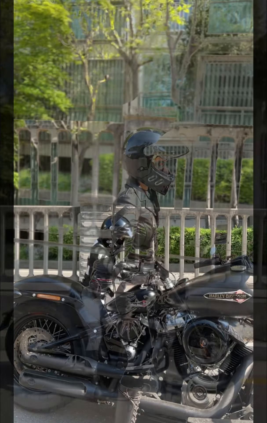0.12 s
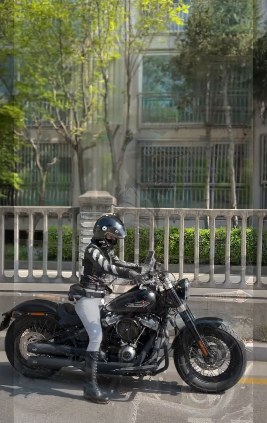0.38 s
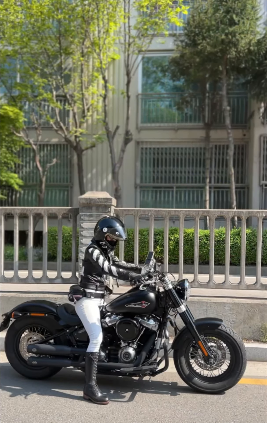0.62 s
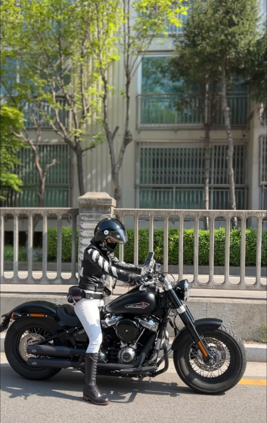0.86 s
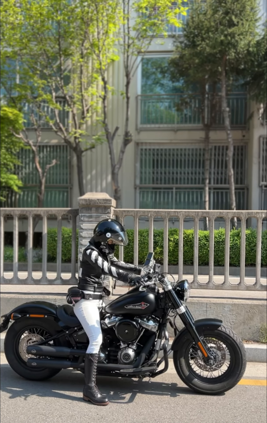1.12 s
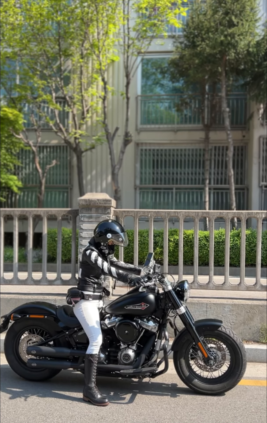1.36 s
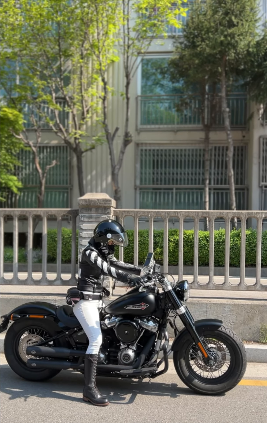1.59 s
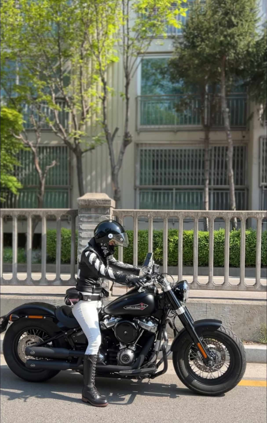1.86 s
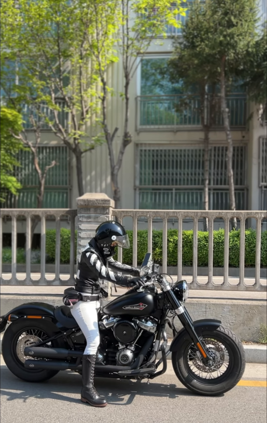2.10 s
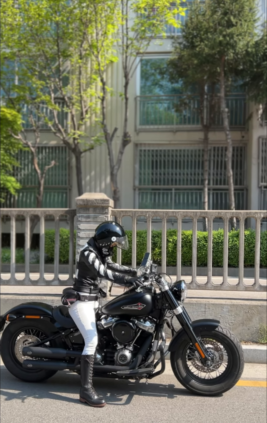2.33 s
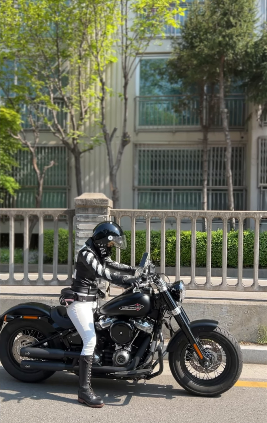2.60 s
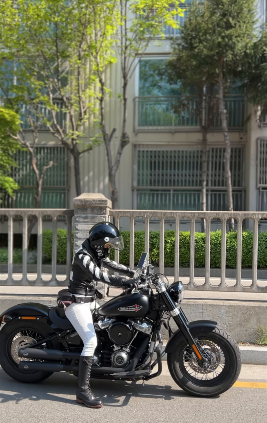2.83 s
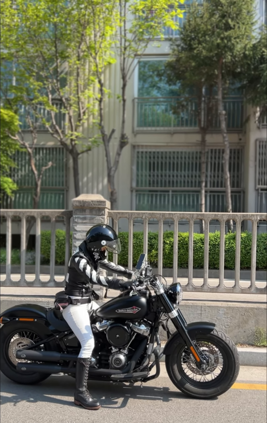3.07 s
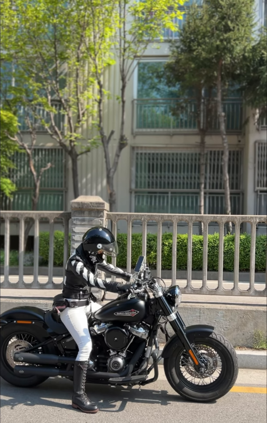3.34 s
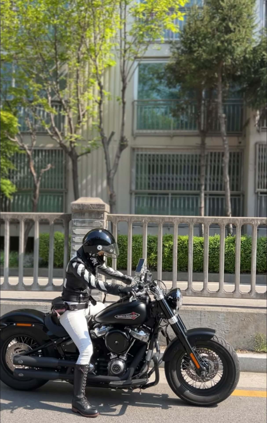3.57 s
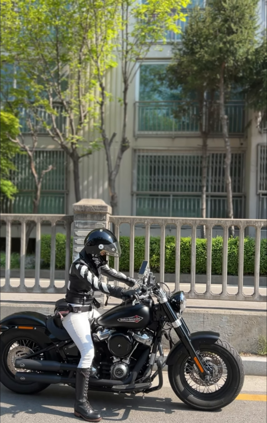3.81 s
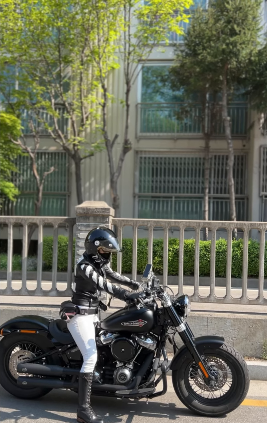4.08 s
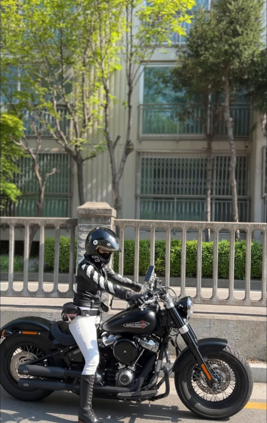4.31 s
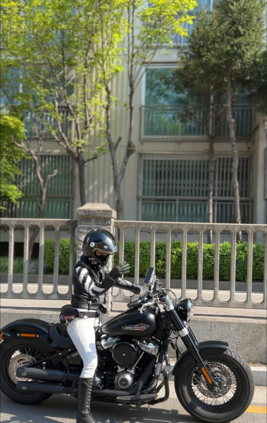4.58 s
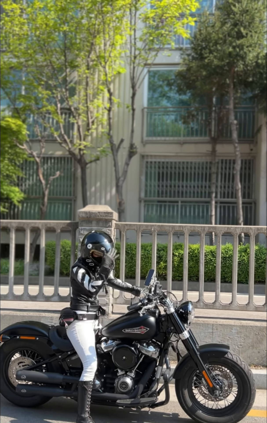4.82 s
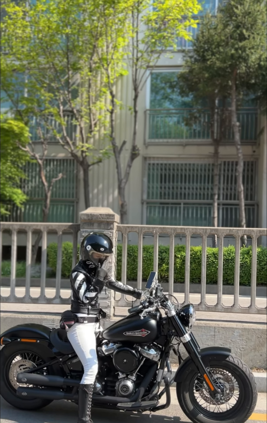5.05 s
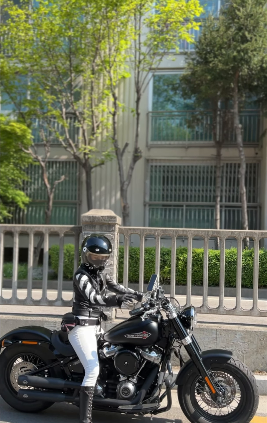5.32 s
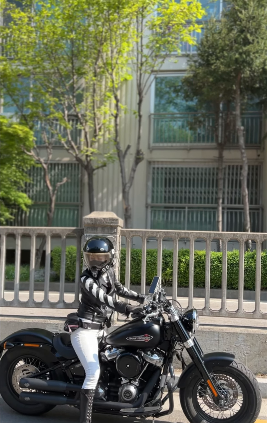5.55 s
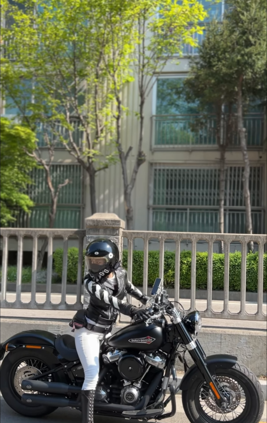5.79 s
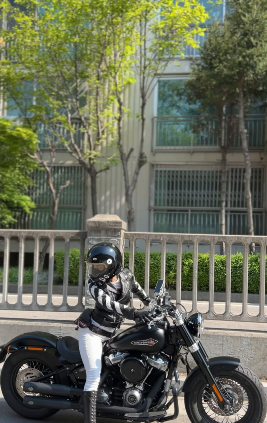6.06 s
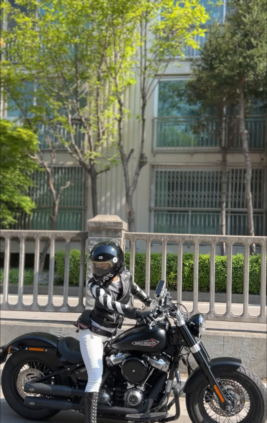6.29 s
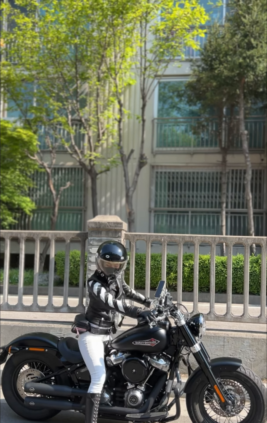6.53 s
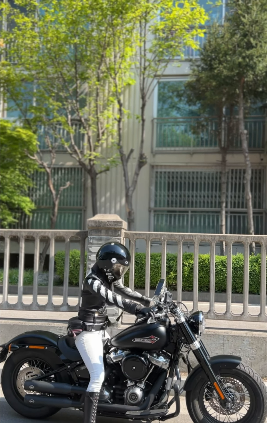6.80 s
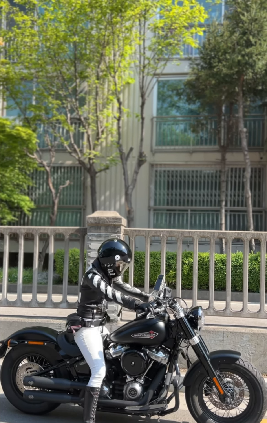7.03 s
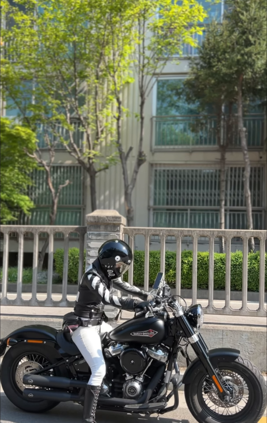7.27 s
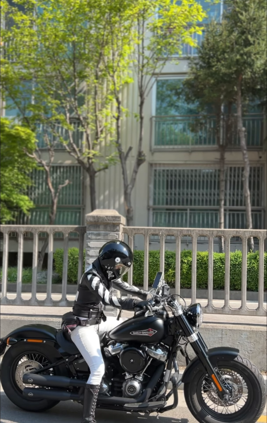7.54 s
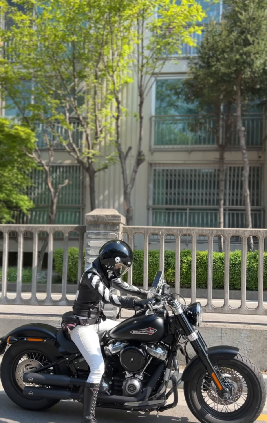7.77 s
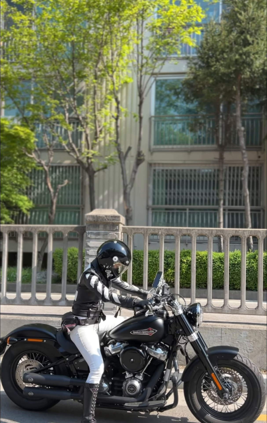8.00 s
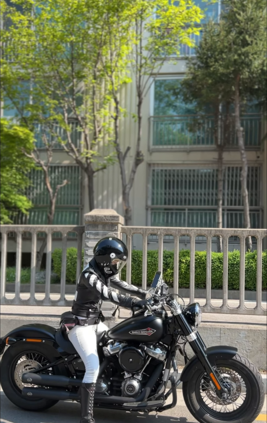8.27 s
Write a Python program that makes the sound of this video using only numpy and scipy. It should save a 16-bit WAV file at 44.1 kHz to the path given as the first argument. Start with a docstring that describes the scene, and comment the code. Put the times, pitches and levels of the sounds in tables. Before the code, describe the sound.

The first 0.7 seconds hold only soft, low distant traffic, a few dull wind puffs at 0.2 to 0.4 and barely audible high ticks. At 0.7 a starter clanks in with two hard metal knocks, then whirs and grinds, its pitch sagging at each compression with bursts of airy hiss. Low pops begin around 1.2, and the engine catches near 1.5 amid rapid clanking until 1.8. The big twin races, peaking about 2.05, then slows through 3.6 to a deep, lumpy, bassy idle, with a small lift near 4.1. Cases rattle, valves tick, gears whine unsteadily. A sharp lever click snaps at 3.5; lighter knocks come at 4.6 and 5.0. At 7.8 first gear engages with a heavy double clunk, a brief shudder and faint high squeak. Idling continues to 8.4, rising slightly. The bike is central, a few metres off, with short wall and road reflections and softened extreme treble.

```python
"""A big V-twin motorcycle starts up a few metres away in a quiet street: the starter clanks in and cranks,
the engine catches, races and settles to a lumpy idle, a lever clicks and first gear clunks in.
The exhaust note is a sum of waves locked to the engine cycle; the first firings ring a resonant pipe.
Starter, cases and valves are shaped noise, gears are wavering tones, and knocks ring metal modes.
Distant traffic and a few puffs of wind on the microphone lie underneath."""
import sys
import numpy as np
from scipy import signal
from scipy.fft import rfft, irfft
from scipy.io import wavfile
from scipy.ndimage import uniform_filter1d

SR = 44100
rng = np.random.default_rng(int(sys.argv[2]) if len(sys.argv) > 2 else 0)


def to_linear_factor(level_db):
    """Convert decibel levels (scalar or array-like) to linear amplitude factors."""
    exponent = np.asarray(level_db, float) / 20
    return 10 ** exponent


def store_wav(level_fs):
    """Save 16-bit WAV to argv[1]."""
    pcm = np.round(np.clip(np.atleast_2d(level_fs), -1, 1) * 32767)
    wavfile.write(sys.argv[1], SR, pcm.T.astype(np.int16))


N = 369999
T = np.arange(N) / SR  # time in seconds

# Colour of the distant traffic. Each row: frequency in Hz, relative level in dB.
TRAFFIC_COLOUR = [(15, -35), (25, -2), (64, 2.5), (394, -10.5), (446, -9.5), (599, -8.5), (889, -9.5),
                  (981, -9.5), (1080, -10.5), (1690, -16.5), (9000, -54), (11700, -87), (19800, -120)]
# Wind on the microphone. Each row: start in seconds (the crest is 0.02 s later), peak in dB.
WIND_PUFFS = [(0.182, -27), (0.299, -38), (0.372, -28)]
# Faint high ticks before the start. Each row: time in seconds, level in dB.
FAINT_TICKS = [(0.134, -57.5), (.188, -58), (.259, -59)]
# The starter labours over each compression. Each row: time of release in seconds, level of the grind in dB,
# level of the hiss in dB, hold of the grind in seconds (the hiss holds half as long).
COMPRESSIONS = [(.724, -33, -38, .004), (.83, -37.5, -33, 0.0051), (1.009, -25.5, -31, .055),
                (1.224, -25, -32.5, 0.032), (1.468, -23, -27.5, 0.017), (1.582, -18.5, -28, .01)]
# Resonances of the starter housing. Each row: frequency in Hz, width in Hz, relative level in dB.
HOUSING_RINGS = [(258, 68, 12.5), (872, 137, 11), (1237, 97, 8.5), (1844, 19, -5.5), (2270, 51, -14),
                 (2945, 23, 1.5), (3240, 44, -26), (3960, 52, -24.5)]
# Overtones of the starter pinion. Each row: multiple of its pitch, relative level in dB.
PINION_TONES = [(1, -2.5), (3, -3), (4, -4), (6, -10), (7, -10)]
# Metal knocks of starter gear, lever and gearbox. Each row: time in seconds, peak in dB,
# rattle decay in seconds, weight of the dull thud in dB, weight of the bright tick in dB.
METAL_KNOCKS = [(0.717, -9.5, 0.0034, -14, -13), (0.7424, -7, 0.0049, -9, -17),
                (0.8244, -18, 0.0058, -11, 5), (1.075, -26, 0.0088, 2, -26), (1.1868, -17, 0.026, -16, -10),
                (1.36, -18.5, 0.0066, -8, 5), (1.5093, -10.5, 0.015, -9, -5.5),
                (1.5503, -12.5, 0.0053, -8.5, -3.5), (1.5782, -6, 0.0044, -37, -11),
                (1.6451, -7, 0.0032, -11, -9.5), (1.6827, -5.5, 0.0058, -32, -10.5),
                (1.7383, -9, 0.0054, -23, -12), (1.772, -18.5, 0.02, -13, -25),
                (3.485, -3, 0.0052, -27, -26), (3.4985, -13, 0.0066, -7.5, -1.5),
                (4.622, -24, 0.006, -14, -20), (5.033, -13, 0.006, -3, -18),
                (7.8204, -2.5, 0.006, -12, -22), (7.836, -6, 0.008, 8, -22), (7.879, -16, 0.01, -6, -5),
                (7.9796, -25, 0.0053, -11, -16)]
# Ways the knocked metal rings. Each row: frequency in Hz, relative level in dB, time to fall 60 dB in seconds.
METAL_MODES = [(342, 11.5, 0.084), (610, -3, 0.05), (856, -6, 0.12), (1236, -6.5, 0.098), (1550, 3, 0.037),
               (1804, 6, 0.028), (2140, 3.5, 0.032), (2616, -6.5, 0.084), (2920, -5, 0.062),
               (3160, -9, 0.062), (4070, -26, 0.19), (5760, 1, 0.017), (6690, 4.5, 0.051),
               (7540, 1.5, 0.04), (9140, 3.5, 0.062)]
# Linkage squeak. The one row: start in seconds, end in seconds, centre pitch in Hz, level in dB.
LINKAGE_SQUEAK = (7.875, 7.97, 4050, -37)
# First uneven firings. Each row: time in seconds, relative strength in dB.
FIRST_FIRINGS = [(1.22, -1.5), (1.475, -3), (1.508, 0.5), (1.559, -0.5), (1.58, 2.5), (1.597, -1),
                 (1.644, 1.5), (1.688, -3.5), (1.737, 3), (1.774, 5), (1.819, 1)]
# Resonances of the exhaust pipe. Each row: frequency in Hz, width in Hz, relative level in dB.
PIPE_RINGS = [(62.6, 8.9, 0.5), (120, 12.5, 2.5), (166.3, 26, 2), (248, 62, -17)]
# Engine speed. Each row: time in seconds, four-stroke cycles per second.
ENGINE_SPEED = [(1.47, 9.176), (1.8, 12.73), (2.05, 13.557), (2.3, 13.037), (2.8, 10.617), (3.15, 9.754),
                (3.65, 8.685), (3.9, 9.393), (4.15, 9.609), (4.65, 8.903), (5.3, 8.873), (6.5, 8.457),
                (6.8, 8.59), (7.1, 8.45), (7.55, 8.712), (8.0, 8.577), (8.39, 8.939)]
# The four speeds at which the exhaust note is given, in cycles per second.
NOTE_SPEEDS = [8.6, 9.5, 10.8, 13.3]
# Exhaust note. Each row: multiple of the cycle rate, then relative level in dB at each of the four speeds.
EXHAUST_ORDERS = [(3, -68, -36, -63, -20), (4, -41, -45, -24.5, -23.5), (5, -31.5, -27, -21, -12.5),
                  (6, -32.5, -33.5, -22.5, -22.5), (7, -14, -13.5, -10.5, -17.5),
                  (8, -19.5, -16.5, -35, -36), (9, -44.5, -41, -35, -22.5), (10, -44.5, -28.5, -21, -13),
                  (11, -27, -53.5, -20.5, -57), (12, -33, -23, -20.5, -21), (13, -32.5, -67, -22, -17),
                  (14, -25, -34.5, -17.5, -31.5), (15, -19.5, -18.5, -37, -26), (16, -43, -43, -21, -79),
                  (17, -18, -18, -26, -36.5), (18, -47, -39, -19.5, -31), (19, -26, -28.5, -48, -35),
                  (20, -36, -35, -50, -67), (21, -45, -41, -61, -74), (22, -30, -38, -51, -39),
                  (23, -33, -35.5, -37, -50), (24, -54, -64, -50, -59), (25, -52.5, -52, -48, -66),
                  (26, -46.5, -32.5, -61, -47)]
# The two firings, 315 and 405 degrees apart. Each row: place in the cycle from 0 to 1, strength in dB.
FIRINGS = [(.9, 1.5), (.3375, 3.5)]
# Valve ticks. Each row: place in the cycle from 0 to 1, strength in dB.
VALVE_TICKS = [(0.8, -5.5), (0.98, 13), (0.7, -11)]
# Colour of the rattle in the engine cases. Each row: frequency in Hz, relative level in dB.
CASE_COLOUR = [(190, -16), (330, -5), (590, 0.5), (1250, -6.5), (1450, -1.5), (1730, -6.5), (2450, -6.5),
               (2790, -5.5), (4770, -20), (9300, -19), (10600, -41), (13800, -77), (22000, -120)]
# Resonances of the cases. Each row: frequency in Hz, width in Hz, relative level in dB.
CASE_RINGS = [(569, 29, -11), (1918, 23, -15.5), (2760, 90, -15.5), (4123, 39, -22), (5830, 110, -24),
              (6490, 48, -27), (7760, 25, -24), (8440, 110, -40)]
# Gear whine. Each row: teeth per cycle, relative level in dB at idle,
# rise in dB per extra cycle per second, backlash in cycles.
GEAR_WHINE = [(169, 1, 1.2, .0008), (326, 2.5, -.3, .0009), (340, -2, -2.5, .0006)]
# Reflections from wall and road. Each row: frequency in Hz, side level in dB.
REFLECTION_COLOUR = [(60, -35), (190, -34), (330, -23), (590, -16), (1040, -19), (1840, -16), (2700, -4),
                     (5780, -3), (10200, -2)]
# Left against right. Each row: frequency in Hz, left minus right in dB.
BALANCE = [(300, 0), (590, 2), (1040, 1.5), (1840, .5), (2900, -5), (4300, 0)]

# each engine layer: (dB at idle, dB per extra cycle per second, extra dB at the catch)
NOTE, BARK = (-2.95, 0.16, 4.9), (-34, 0.61, 11)
RATTLE, TICKS, GEARS = (-35, 1, 17.5), (-20.5, 0.93, 1), (-42, .7, -4)  # TICKS is relative to RATTLE
IDLE_SPEED = 8.6  # four-stroke cycles per second
CATCH_S, CATCH_TURN = 1.47, .603  # when the engine catches, and at which place in its cycle
CATCH_FADE_S = 0.26  # the roughness of the first firings dies away
SHUDDER_S, SHUDDER_DB, SHUDDER_FADE_S = 7.83, 16.5, 0.035  # first gear shakes the cases
STARTER_ON_S, STARTER_OFF_S, STARTER_FADE_S = .705, 1.51, 0.094
GRIND_DB, HISS_DB = -37.5, -49.5  # starter between compressions
BUILD_S, RELEASE_S, HISS_BUILD_S, HISS_RELEASE_S = 0.026, 0.0094, 0.01, 0.0069
WHIR_HZ, WHIR_DB = 318, -39  # pinion without load
WHIR_SAG, WHIR_SLOW_S, WHIR_RECOVER_S = .2, .035, .05  # share of the pitch lost under load, and its timing
STREET_LEVEL_DB, STREET_FADE_DB, STREET_FADE_S = -35.5, -4, 0.55  # the street swells in from the start


def unit(x):
    """Scale to rms 1."""
    return x / np.sqrt(np.mean(x ** 2))


def noise():
    """White noise."""
    return rng.standard_normal(N)


def curve(table):
    """Columns of a table as signals over time."""
    s, *columns = np.transpose(table)
    return [np.interp(T, s, c) for c in columns]


def colour(x, points):
    """Shape a sound by (Hz, dB) points."""
    hz, db = np.transpose(points)
    f = np.fft.rfftfreq(N, 1 / SR) + 1
    return irfft(rfft(x) * to_linear_factor(np.interp(np.log(f), np.log(hz), db)), N)


def ring(x, hz, width_hz):
    """Two-pole resonance, gain 1 at the centre."""
    return signal.lfilter(*signal.iirpeak(hz, hz / width_hz, SR), x)


def band(x, low_hz, high_hz):
    """Steep band-pass."""
    return signal.sosfilt(signal.butter(3, [low_hz, high_hz], "band", fs=SR, output="sos"), x)


def walk(rate):
    """Random levels held 1 / rate seconds and smoothed twice; spread near 1."""
    hold = int(SR / rate)
    steps = np.repeat(rng.standard_normal(N // hold + 1), hold)
    return 1.49 * uniform_filter1d(uniform_filter1d(steps, hold), hold)[:N]


def swell(s, build_s, release_s, hold_s=0.):
    """Exponential build-up, a hold that ends at s, then exponential release."""
    return np.exp(-np.maximum(s - hold_s - T, 0) / build_s - np.maximum(T - s, 0) / release_s)


def gate(turn, places, length, scatter_db):
    """A decaying burst at each place in the cycle, every one with its own strength; length in cycles."""
    out = 0
    for place, db in places:
        since = turn - place + 1
        size = to_linear_factor(db + scatter_db * rng.standard_normal(100))[since.astype(int)]
        attack = np.minimum(since % 1 / 0.007, 1)
        out = out + size * np.exp(-(since % 1) / length) * attack
    return out


def layer_db(law, speed):
    """Level rises with speed, with a surplus (or lack) that fades after the catch."""
    idle_db, rise_db, catch_db = law
    fade = np.exp(-np.maximum(T - CATCH_S, 0) / CATCH_FADE_S)
    return idle_db + rise_db * (speed - IDLE_SPEED) + catch_db * fade


def street():
    """Far traffic as coloured noise, wide in the treble, with short low puffs of wind and faint ticks."""
    mid, side = (unit(colour(noise(), TRAFFIC_COLOUR)) * to_linear_factor(0.67 * walk(9)) for _ in range(2))
    side = colour(side, [(60, -36), (250, -22.5), (800, -7), (2000, -27), (5000, 2.5)])
    puffs = 0
    for s, db in WIND_PUFFS:
        since = T - s - .02
        puffs = puffs + to_linear_factor(db) * np.exp(-(since / 0.024) ** 2) * np.cos(2 * np.pi * 55 * since)
    ticks = sum(to_linear_factor(db) * swell(s, .002, 0.01) for s, db in FAINT_TICKS) * unit(band(noise(), 5000, 9800))
    level_db = STREET_LEVEL_DB + STREET_FADE_DB * np.maximum(1 - T / STREET_FADE_S, 0)
    return to_linear_factor(level_db) * np.array([mid + side, mid - side]) + puffs + ticks


def starter():
    """Gear grind in the housing's resonances, the pinion's whir, and air hissing at each compression."""
    load, leak = to_linear_factor(GRIND_DB), to_linear_factor(HISS_DB)
    for s, grind_db, hiss_db, hold_s in COMPRESSIONS:
        load = load + to_linear_factor(grind_db) * swell(s, BUILD_S, RELEASE_S, hold_s)
        leak = leak + to_linear_factor(hiss_db) * swell(s, HISS_BUILD_S, HISS_RELEASE_S, hold_s / 2)
    teeth = noise() * to_linear_factor(1.8 * walk(90))
    housing = sum(to_linear_factor(db + 2.0 * walk(17)) * unit(ring(teeth, hz, w)) for hz, w, db in HOUSING_RINGS)
    grind = unit(housing + 2.2 * unit(band(teeth, 250, 2640)))
    hiss = unit(band(noise(), 3500, 9100) + 1.0 * ring(noise(), 7000, 1500))
    switch_s = [STARTER_ON_S - .005, STARTER_ON_S, STARTER_OFF_S, STARTER_OFF_S + STARTER_FADE_S]
    on = np.interp(T, switch_s, [0, 1, 1, 0])
    # the pinion sags in pitch and level under load
    drag = np.max([swell(row[0], WHIR_SLOW_S, WHIR_RECOVER_S) for row in COMPRESSIONS], axis=0)
    whir_hz = WHIR_HZ * (1 - WHIR_SAG * drag) * (1 + .025 * walk(70))
    pinion = 2 * np.pi * np.cumsum(whir_hz) / SR
    whir = 0
    for multiple, db in PINION_TONES:
        whir = whir + to_linear_factor(WHIR_DB + db - 9 * drag + 5.0 * walk(25)) * np.cos(round(multiple) * pinion)
    return on * (load * grind + leak * hiss + whir)


def knocks():
    """Each blow is a short rattle that cracks and rings the same metal modes with its own weights."""
    out, t = np.zeros(N + SR), T[:SR // 3]
    hz, mode_db, t60 = np.transpose(METAL_MODES)[:, :, None]
    for s, db, length, thud_db, tick_db in METAL_KNOCKS:
        tilt_db = np.where(hz < 1000, thud_db, np.where(hz > 5000, tick_db, 0))
        # every blow excites the modes a little differently in level and pitch
        chance = rng.standard_normal((2, len(METAL_MODES), 1))
        size = to_linear_factor(mode_db + tilt_db + 2.0 * chance[0]) * np.exp(-np.log(1000) * t / t60)
        modes = size * np.sin(2 * np.pi * hz * (1 + 0.0337 * chance[1]) * t)
        rattle = rng.standard_normal(len(t)) * np.exp(-t / np.clip(length, .004, .05))
        rattle = rattle * np.minimum(t / 0.0011, 1)
        crack = band(rattle, 690, 4370)
        crack = crack + to_linear_factor(tick_db) * band(rattle, 3300, 7000)
        crack = crack + 5.2 * to_linear_factor(thud_db) * band(rattle, 255, 920)
        ringing = signal.fftconvolve(modes.sum(axis=0), rattle)[:len(t)]
        blow = unit(ringing) + 1.05 * unit(crack)
        out[int(s * SR):][:len(t)] += to_linear_factor(db) * blow / np.abs(blow).max()
    return out[:N]


def pops():
    """Single firings ring the cold pipe before the rhythm is steady."""
    push = np.zeros(N)
    for s, db in FIRST_FIRINGS:
        push[int(s * SR)] = to_linear_factor(db)
    push = np.convolve(push, np.hanning(90), "same")  # each push lasts about 2 ms
    # neighbouring resonances take opposite signs
    return 3.4 * sum((-1) ** k * to_linear_factor(db) * ring(push, hz, w) for k, (hz, w, db) in enumerate(PIPE_RINGS))


def exhaust(speed, turn, note_db, bark_db):
    """Cycle harmonics that crest together once a cycle (the lowest ones inverted), and a rough bark per firing."""
    note = 0
    for multiple, *db in EXHAUST_ORDERS:
        k = round(multiple)
        level = to_linear_factor(np.interp(speed, NOTE_SPEEDS, db) + 1.6 * walk(12))
        phase = 2 * np.pi * k * turn + .6 + (.15 + .014 * k) * walk(5)
        # the short high harmonics crest again when the second cylinder blows
        second = .55 * (k > 17.5) * np.cos(phase - 2 * np.pi * k * .36)
        sign = 1 if k >= 7 else -1
        note = note + sign * level * np.sqrt(2) * (np.cos(phase) + second)
    bark = unit(band((0.41 + gate(turn, FIRINGS, 0.091, 0.97)) * noise(), 203, 283))
    return to_linear_factor(note_db) * note + to_linear_factor(bark_db) * bark


def mechanics(speed, turn, level_db, treble_db, whine_db):
    """Rattle in the cases that swells with each firing, valve ticks, and gear whine on the uneven crank."""
    rattle = noise() * (1 + 0.93 * gate(turn, FIRINGS, 0.14, 2.0)) * to_linear_factor(0.82 * walk(25))
    rings = sum(to_linear_factor(db + 1.7 * walk(14)) * unit(ring(noise(), hz, w)) for hz, w, db in CASE_RINGS)
    ticks = unit(band(noise() * (.5 + gate(turn, VALVE_TICKS, .04, 3.0)), 3800, 10400))
    # the crank turns unevenly, so the whine wobbles; backlash makes it flutter and break
    crank = turn + 0.0011 * np.sin(4 * np.pi * turn) + 0.00033 * np.sin(2 * np.pi * turn)
    whine = 0
    for teeth, db, rise_db, backlash in GEAR_WHINE:
        tone_db = db + rise_db * (speed - IDLE_SPEED) + .8 * walk(9) + 2.8 * walk(40)
        whine = whine + to_linear_factor(tone_db) * np.cos(2 * np.pi * teeth * (crank + backlash * walk(60)))
    cases = unit(colour(rattle, CASE_COLOUR)) + rings
    return to_linear_factor(level_db) * (cases + to_linear_factor(treble_db) * ticks) + to_linear_factor(whine_db) * whine


def squeak():
    """A linkage squeaks briefly: one high tone whose pitch wavers at random."""
    start, end, hz, db = LINKAGE_SQUEAK
    shape = np.interp(T, [start, start + .006, end - .03, end], [0, 1, .6, 0])
    return to_linear_factor(db) * shape * np.sin(2 * np.pi * np.cumsum(hz + 25 * walk(60)) / SR)


def scene():
    """The bike in the middle; wall and road reflections differ left and right."""
    speed = curve(ENGINE_SPEED)[0]
    turn = np.cumsum(speed * (T >= CATCH_S)) / SR + CATCH_TURN  # engine cycles
    laws = (NOTE, BARK, RATTLE, TICKS, GEARS)
    note_db, bark_db, level_db, treble_db, whine_db = (layer_db(law, speed) for law in laws)
    shudder_db = SHUDDER_DB * swell(SHUDDER_S, .003, SHUDDER_FADE_S)
    running = np.interp(T, [CATCH_S, 1.6, 1.85], [0, .4, 1])
    engine = exhaust(speed, turn, note_db, bark_db + shudder_db)
    engine = engine + mechanics(speed, turn, level_db + shudder_db, treble_db, whine_db)
    bike = running * engine + pops() + starter() + knocks() + squeak()
    # reflections: two independent decaying noise tails
    tail = rng.standard_normal((2, 8000)) * np.exp(-T[:8000] / 0.029)
    tail /= np.sqrt(np.sum(tail ** 2, axis=1, keepdims=True))
    echo, side = (signal.fftconvolve(bike, h)[:N] for h in tail)
    mid = bike + to_linear_factor(-9.5) * band(echo, 318, 8300)
    side = colour(side, REFLECTION_COLOUR)
    left = colour(mid + side, [(hz, db / 2) for hz, db in BALANCE])
    right = colour(mid - side, [(hz, -db / 2) for hz, db in BALANCE])
    return np.array([left, right]) + street()


def band_limit(x):
    """A steep low-pass at the top of the band."""
    return signal.sosfilt(signal.butter(12, 10830, fs=SR, output="sos"), x)


def record(dry):
    """The recorder rounds the highest peaks and drops the top above about 10 kHz."""
    soft = dry / (1 + np.abs(dry) ** 4) ** .25
    low_pass = signal.butter(14, 10250, fs=SR, output="sos")
    mix = signal.sosfilt(low_pass, soft)
    return band_limit(mix)


dry = scene()
out = record(dry)
store_wav(out)
```